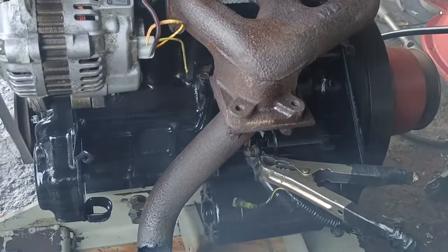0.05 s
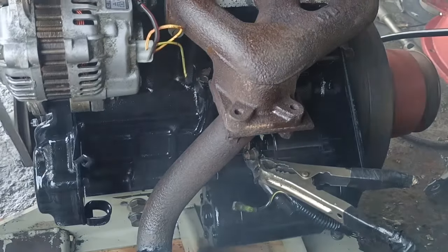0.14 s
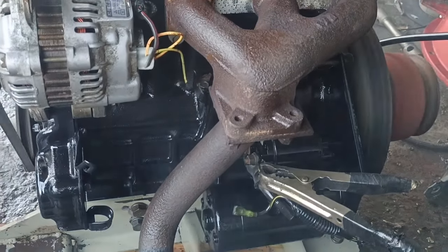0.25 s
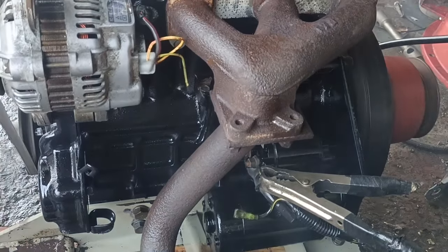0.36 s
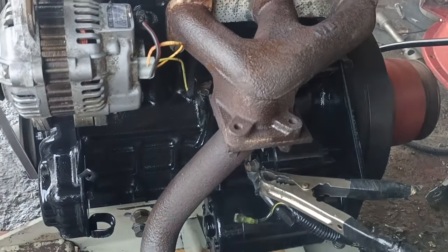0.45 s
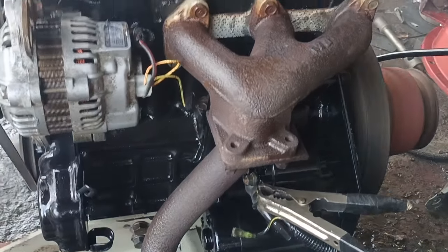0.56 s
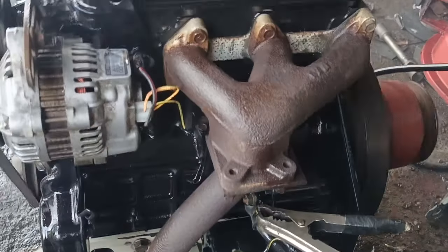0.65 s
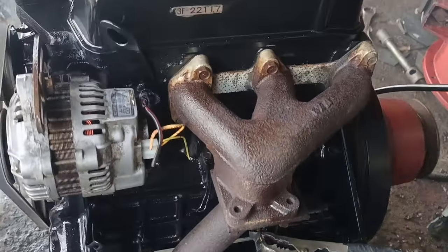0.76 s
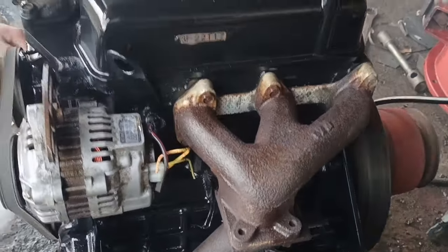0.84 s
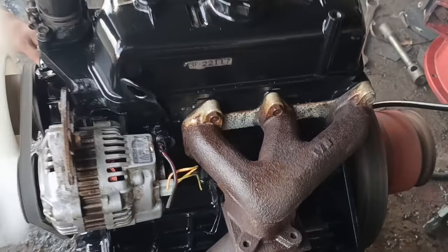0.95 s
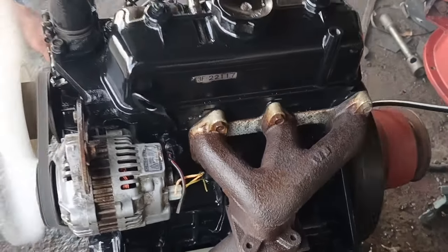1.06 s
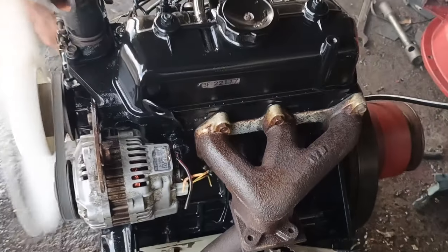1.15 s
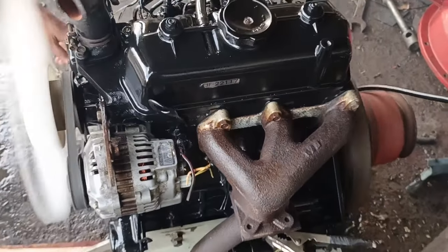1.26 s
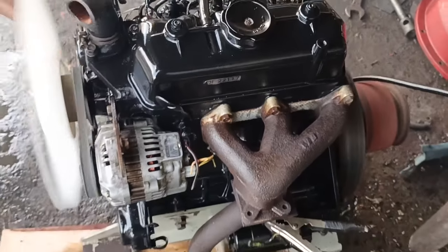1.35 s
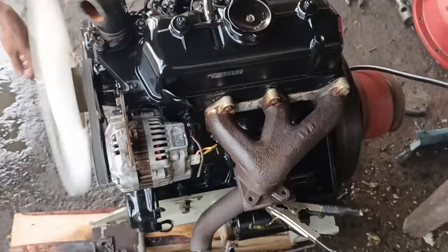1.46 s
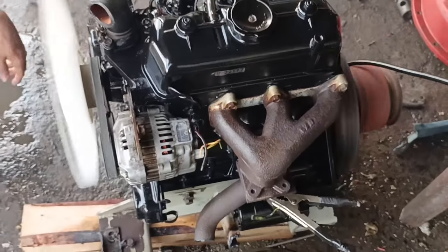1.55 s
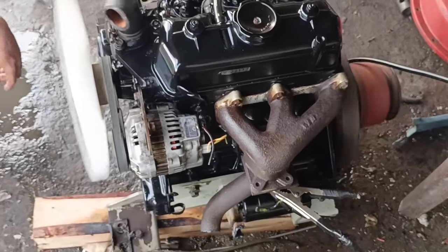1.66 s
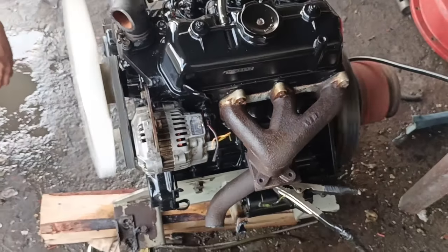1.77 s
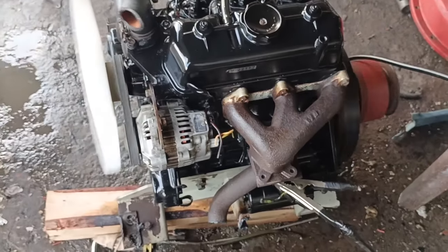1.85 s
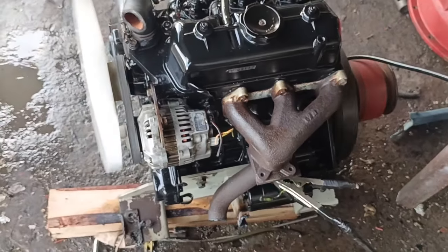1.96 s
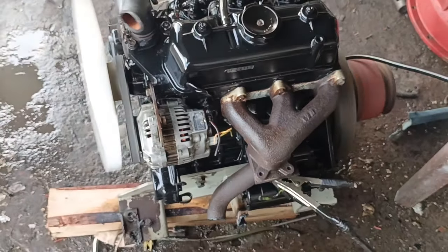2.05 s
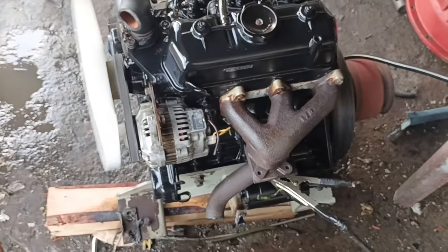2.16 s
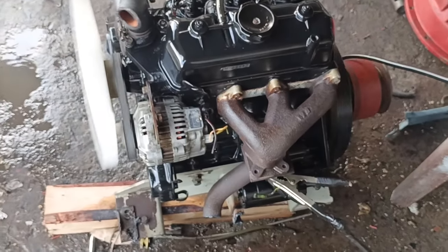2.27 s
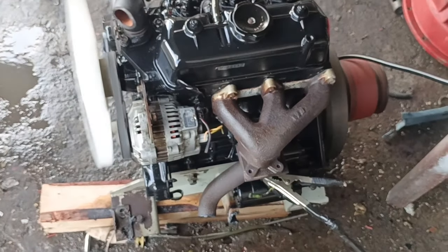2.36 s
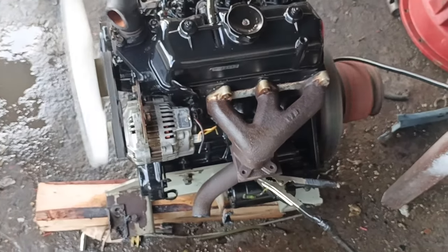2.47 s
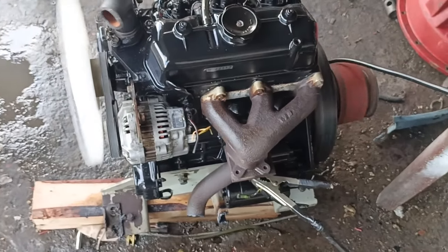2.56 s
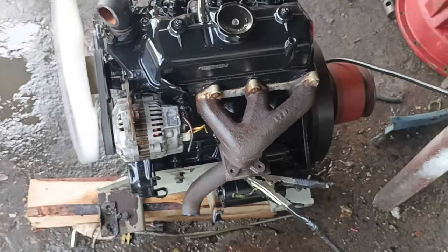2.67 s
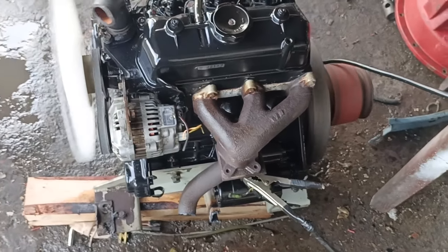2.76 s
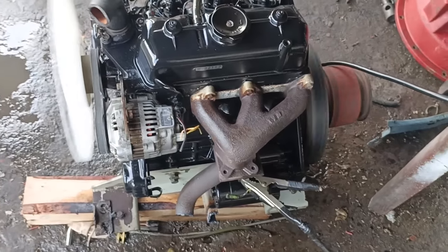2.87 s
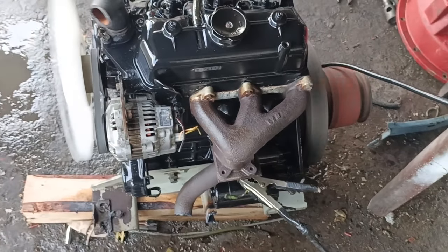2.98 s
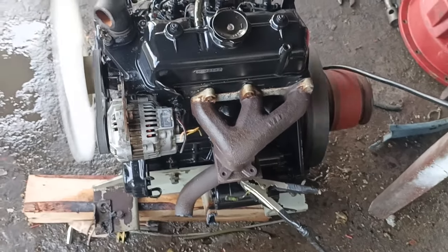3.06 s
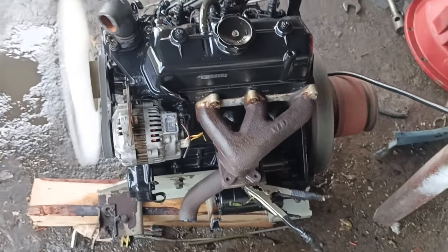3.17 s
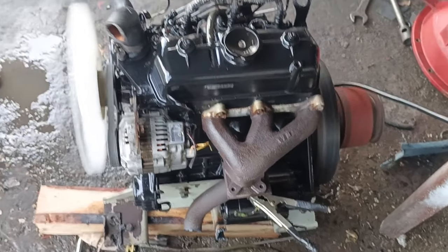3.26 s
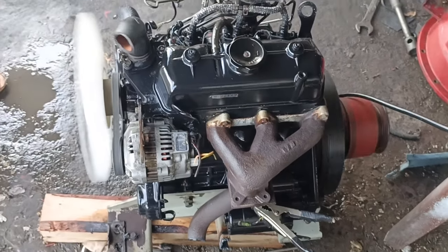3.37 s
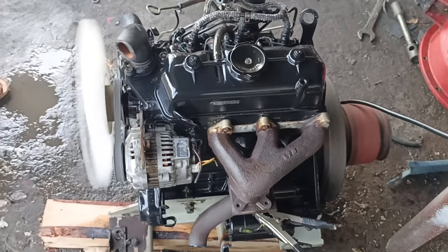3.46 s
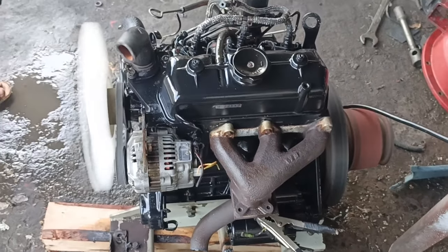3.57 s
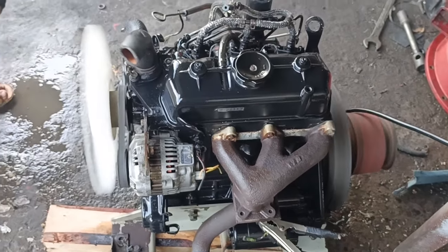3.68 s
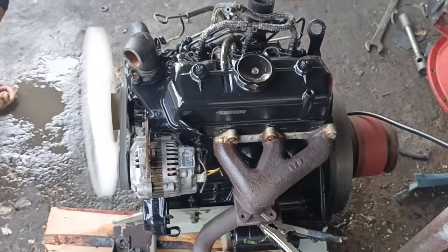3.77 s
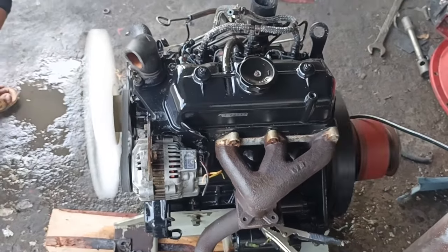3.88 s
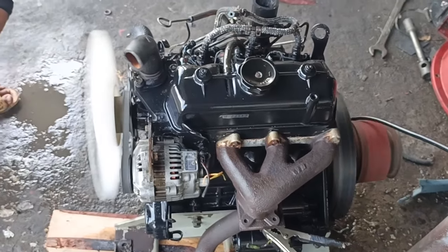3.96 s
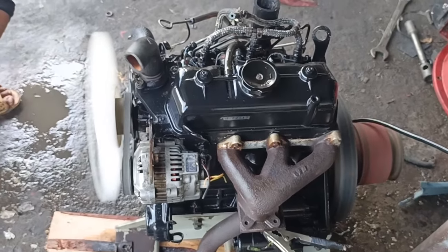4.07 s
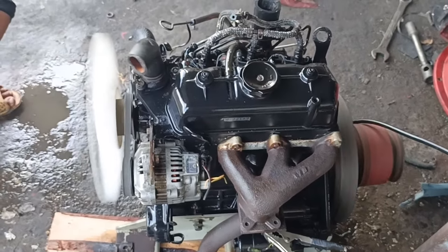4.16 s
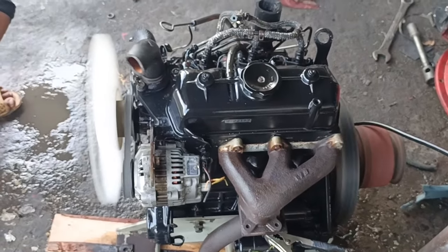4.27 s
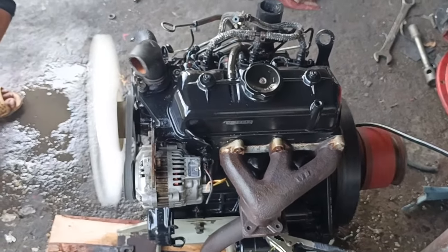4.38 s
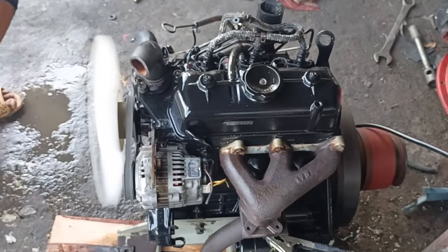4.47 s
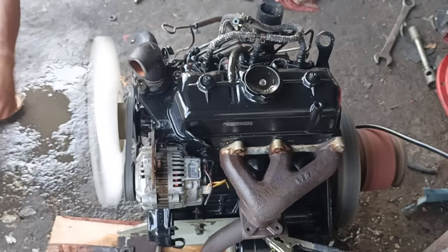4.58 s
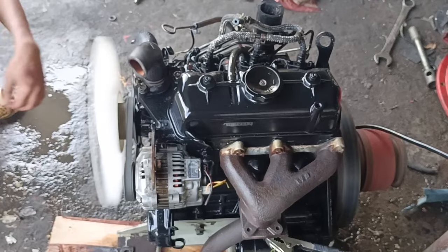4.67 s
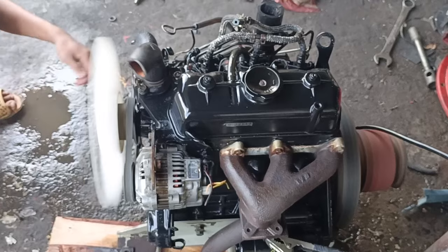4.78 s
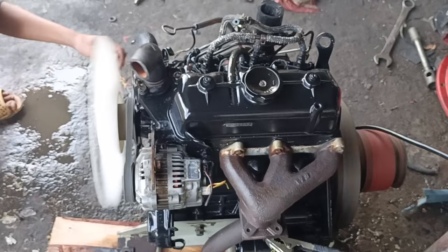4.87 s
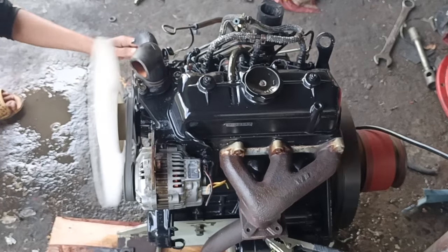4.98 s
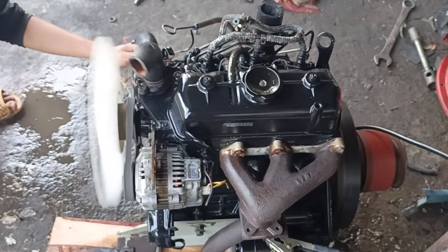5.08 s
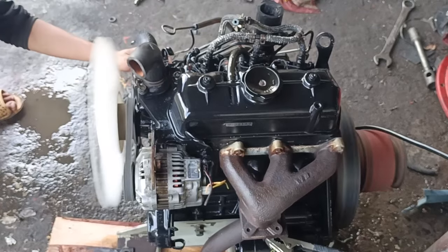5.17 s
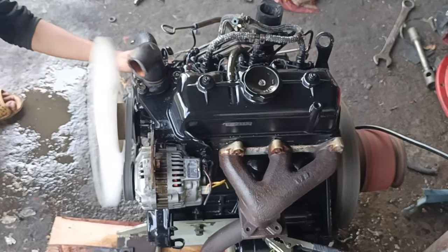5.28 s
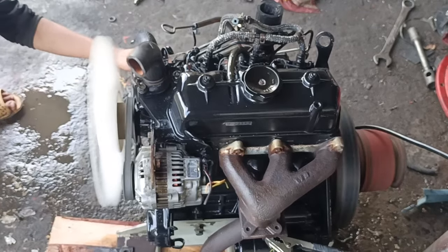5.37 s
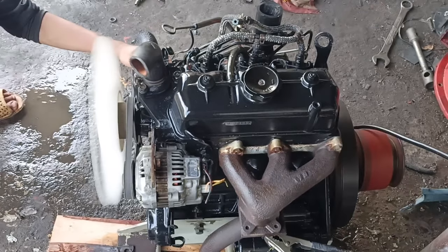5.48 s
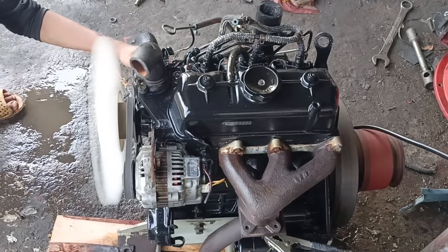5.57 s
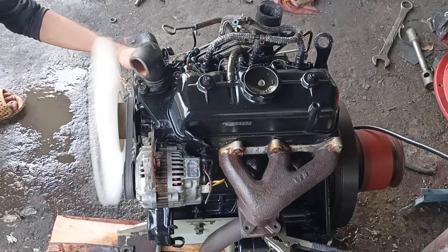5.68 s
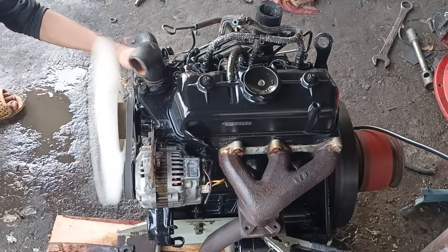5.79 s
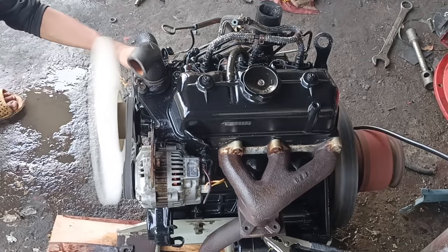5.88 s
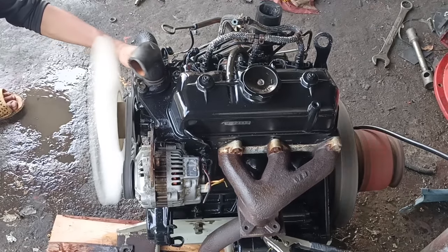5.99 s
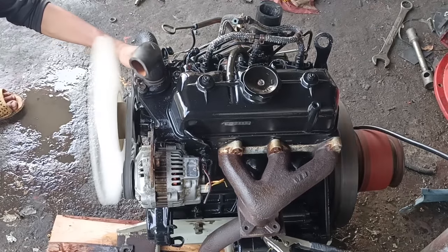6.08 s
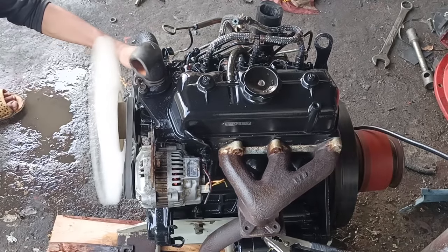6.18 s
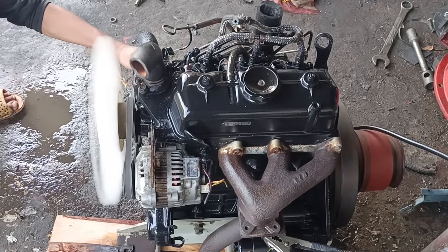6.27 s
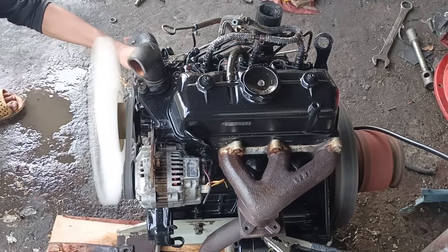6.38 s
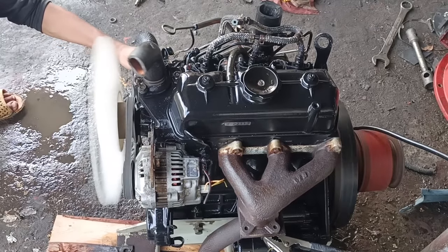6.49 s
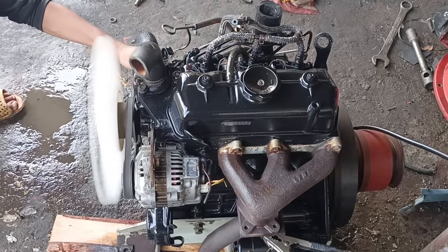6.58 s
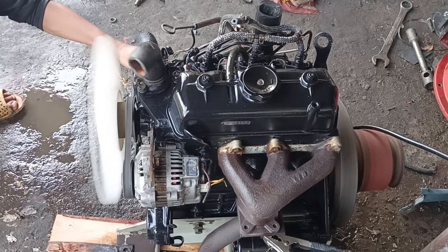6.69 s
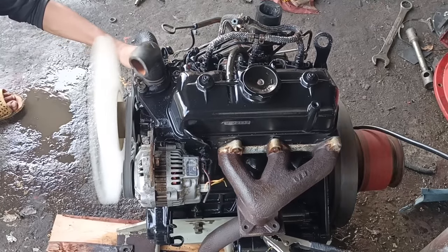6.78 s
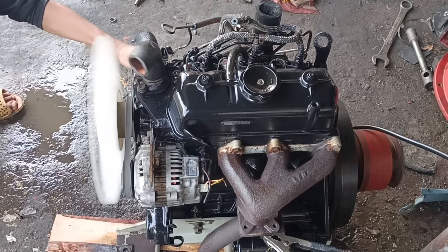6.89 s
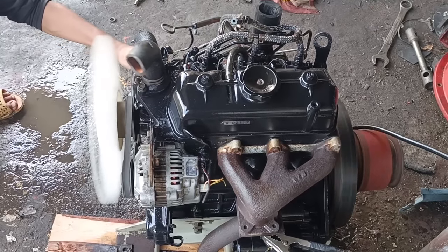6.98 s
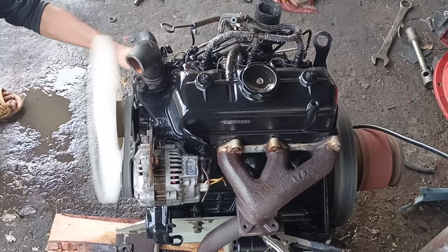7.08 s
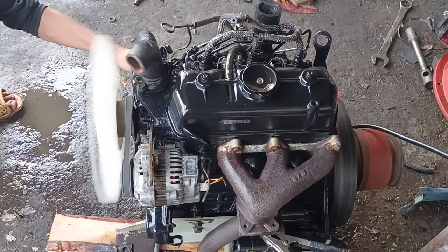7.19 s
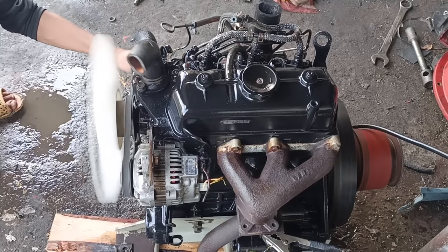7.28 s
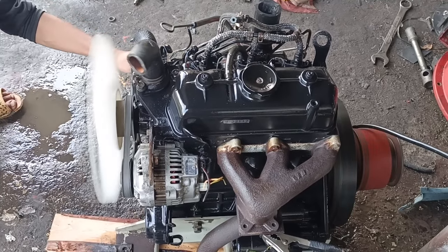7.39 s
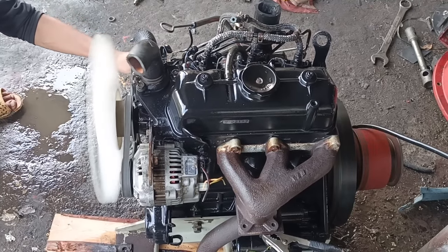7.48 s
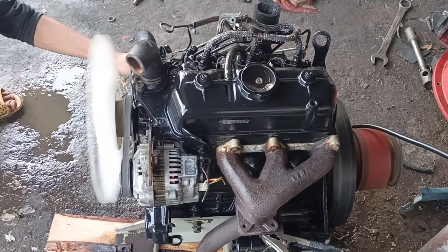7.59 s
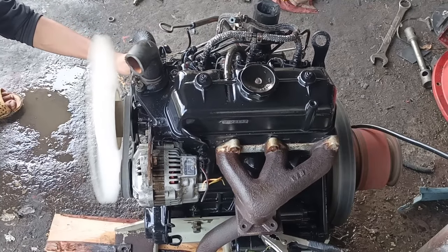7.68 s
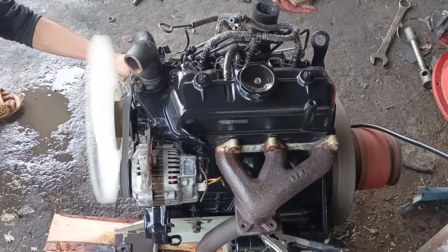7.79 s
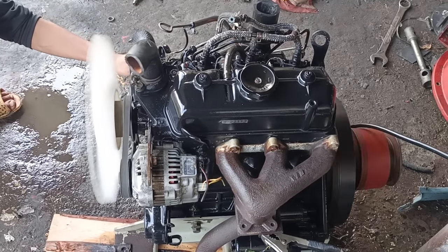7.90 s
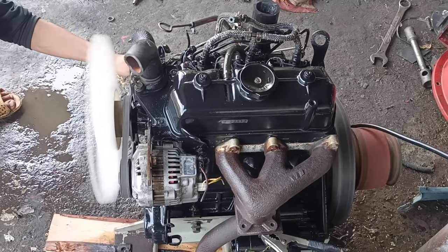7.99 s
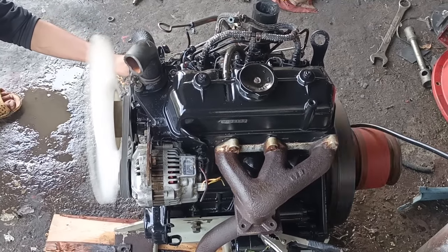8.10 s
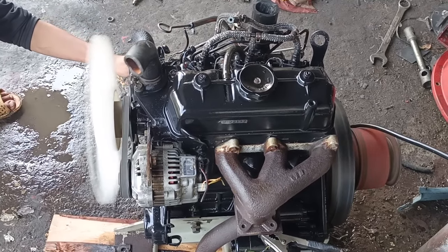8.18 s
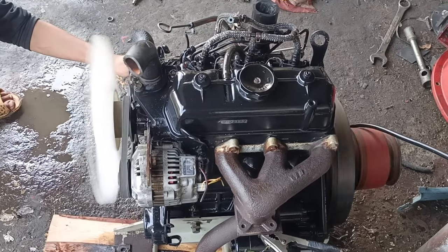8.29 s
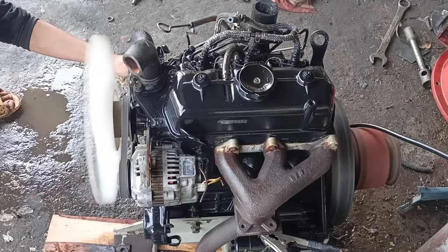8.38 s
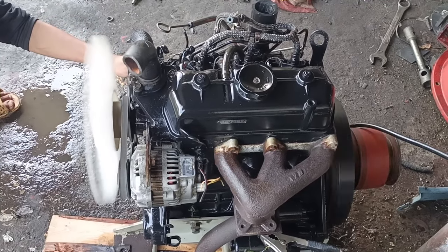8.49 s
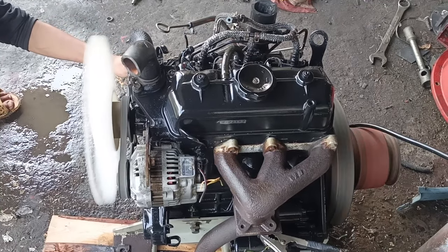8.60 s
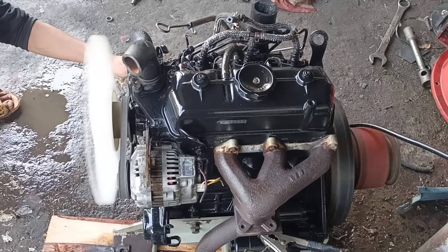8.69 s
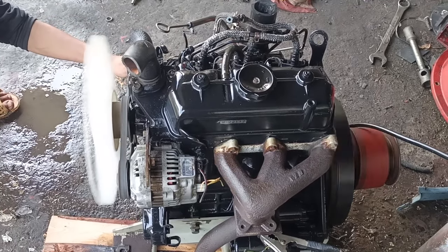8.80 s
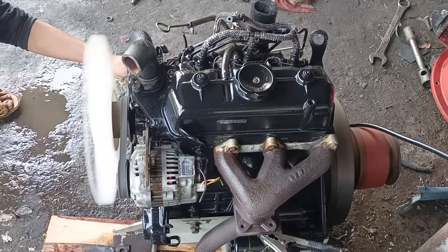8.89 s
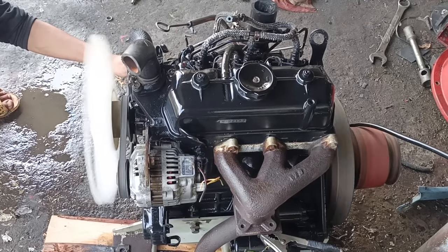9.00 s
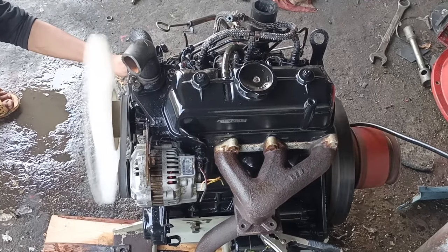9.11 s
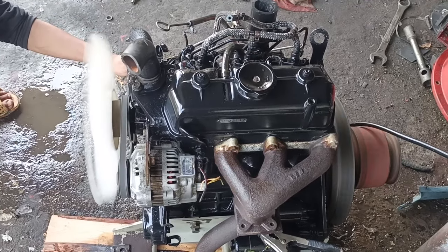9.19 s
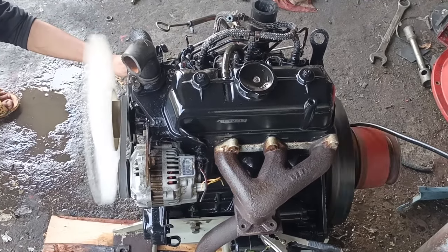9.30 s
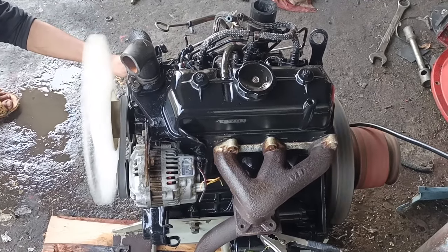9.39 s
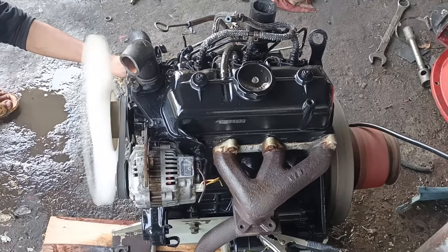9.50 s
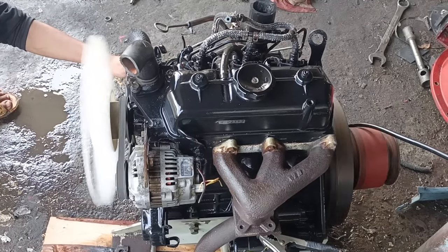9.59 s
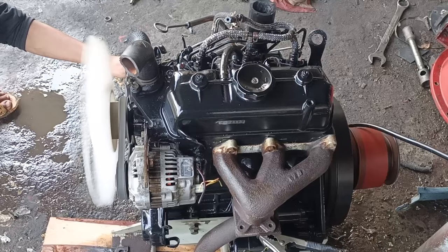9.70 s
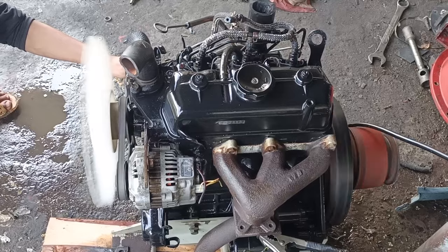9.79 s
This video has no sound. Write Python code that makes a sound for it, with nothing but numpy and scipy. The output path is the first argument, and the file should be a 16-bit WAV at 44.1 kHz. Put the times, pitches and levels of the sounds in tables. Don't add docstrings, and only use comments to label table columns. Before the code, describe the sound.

From 0 s a small three-cylinder diesel is already running fast, very close, its open exhaust blending about 49 pulses a second into a rough, low buzzing roar. Knocking metal, loose rattles and a thin ticking valve hiss ride on top. Between about 0.7 and 1.8 s the microphone backs off to a metre, so the exhaust softens and its tone shifts; a brief lean-in comes near 3 s. Underneath, slightly left, a second engine hums in wavering low tones, beating against the first; from about 4.1 s it slows, falling in pitch, and fades away after 5.4 s. The near engine holds steady until just before 7 s, when speed flicks up slightly and fuel is cut. Exhaust force collapses to quiet hollow pumping; pitch slides down, individual knocks separate, and looser clatter and valve ticks stand out. By 9.85 s it turns at roughly half speed, still coasting, with two stray ticks near the end.

```python
import sys
import numpy as np
from scipy import signal
from scipy.io import wavfile
from scipy.ndimage import uniform_filter1d

SR = 44100
rng = np.random.default_rng(int(sys.argv[2]) if len(sys.argv) > 2 else 0)


def store_wav(level_fs):
    pcm = np.round(np.clip(np.atleast_2d(level_fs), -1, 1) * 32767)
    wavfile.write(sys.argv[1], SR, pcm.T.astype(np.int16))


def natural_amplitude(level_db):
    exponent = np.asarray(level_db, float) / 20
    return 10 ** exponent


N = 434385
TIME = np.arange(N) / SR
SLOW = 64


def evened(x):
    return x / np.sqrt(np.mean(x ** 2) + 1e-20)


def read(points, hz):
    f, value = np.transpose(points)
    return np.interp(np.log(hz + 1), np.log(f + 1), value)


def curves(rows, step=1):
    s, *columns = np.transpose(rows)
    return [np.interp(TIME[::step], s, column) for column in columns]


def full(slow):
    return np.interp(TIME, TIME[::SLOW], slow)


def drift(per_s):
    size = max(int(SR / SLOW / per_s), 1)
    wander = rng.standard_normal(len(TIME[::SLOW]))
    return evened(uniform_filter1d(uniform_filter1d(wander, size), size))


# f/Hz, likeness [0-1]
PORT_LIKENESS = [(60, 1), (130, 1.0), (290, 0.86), (640, 1), (1410, 0.77), (3100, 0.6), (6820, 0.13),
                 (15000, 0.01)]
# f/Hz, left minus right level/dB
PORT_BALANCE = [(60, 0.0), (92, 4), (140, 7), (210, 0), (330, 6), (500, 2.5), (770, 0), (1170, 3.5),
                (1790, 4), (2740, 2), (4190, -2.5), (6410, -11.5), (9810, 10.5), (15000, 6.5)]


def ports(a, b, hz):
    same = np.clip(read(PORT_LIKENESS, hz), 0, 1)
    lean = natural_amplitude(read(PORT_BALANCE, hz) / 2)
    mixed = same * a + np.sqrt(1 - same ** 2) * b
    return np.array([a * lean, mixed / lean])


def noise(spectrum, patchy_db):
    hz = np.fft.rfftfreq(512, 1 / SR)
    a, b, c, d, patches = rng.standard_normal((N // 128 + 5, 257, 5)).T
    patches = evened(uniform_filter1d(uniform_filter1d(patches, 5, 0), 12, 1))
    colour_db = read(spectrum, hz)[:, None] + patchy_db * patches
    z = ports(a + 1j * b, c + 1j * d, hz[:, None]) * natural_amplitude(colour_db)
    return evened(signal.istft(z, nperseg=512, noverlap=384)[1][:, :N])


# t/s, firings [per s]
SPEED = [(0, 49.05), (1, 48.97), (1.9, 48.92), (2.4, 49.1), (4, 49.18), (5, 49.2), (5.5, 49.3), (6, 49.16),
         (6.7, 49.2), (6.93, 49.9), (7.21, 48.2), (7.52, 45.3), (8.01, 39.5), (8.29, 37.9), (8.72, 35.0),
         (9.3, 30.2), (9.85, 26.5)]
# t/s, closeness to the pipe [0-1], fuel [0-1]
STATE = [
    (0, 0.64, 0.97),
    (.7, 0.62, 0.96),
    (1.2, 0.35, 0.92),
    (1.8, 0.24, 0.98),
    (6.85, 0.08, 1),
    (7.1, 0.03, 0.02),
    (9.85, 0.4, 0.05),
]
# t/s, distance [m]
DISTANCE = [
    (0, 0.64),
    (.3, 0.59),
    (1.1, 0.76),
    (1.7, 1),
    (2.7, 1.03),
    (3.15, 0.91),
    (3.7, 1.03),
    (6.8, 1.0),
    (9.85, 1.02),
]
LOUDNESS = [
    (-20.5, 1.23, -4, -11),
    (-24.5, 0.88, -1.56, -8.5),
    (-35.5, 0.97, -.5, -10),
]


def levels(step=1):
    metres, fuel, rate = curves(DISTANCE, step)[0], curves(STATE, step)[1], curves(SPEED, step)[0]
    governed, shake_rate, shake_width = 49.2, 31.7, 4.3
    shake_db = 4.5 * np.exp(-((rate - shake_rate) / shake_width) ** 4)
    exhaust_db, clatter_db, hiss_db = (
        db - share * 20 * np.log10(metres) + (1 - fuel) * unfuelled_db + halving_db * np.log2(governed / rate)
        for db, share, unfuelled_db, halving_db in LOUDNESS)
    return exhaust_db, clatter_db, hiss_db + shake_db


# multiple of the firing rate, close level/dB, far level/dB
BLOWS = [(1, -35, -34.5), (2, -14, -22.5), (3, -11, -24.5), (4, -28, -22.5), (5, -20.5, -23.5),
         (6, -21.5, -28.5), (7, -18.5, -30), (8, -67, -36.5), (9, -40, -52), (10, -54, -57), (11, -47, -50),
         (12, -60, -60), (13, -60, -60), (14, -60, -62), (15, -60, -60)]
# f/Hz, level/dB
PIPE = [(50, -45), (77, -38), (86, -43), (100, -23.5), (120, -18), (145, -25), (175, -35.5), (205, -22),
        (240, -22), (290, -29.5), (350, -37.5), (450, -42), (600, -55)]
# f/Hz, level/dB re exhaust
UNEVEN = [(30, -68), (70, -29), (115, -19.5), (170, -31.5), (230, -29.5), (320, -24.5), (370, -27.5),
          (450, -35)]
PUMP_TILT_DB = -0.48
PUMP_OPPOSES = (3, 4)
PUMP_SWELL = 0.27
ECHO_S, ECHO = .008, .65


def exhaust(firings):
    rate, level_db = curves(SPEED, SLOW)[0], levels(SLOW)[0]
    close, fuel = np.clip(curves(STATE, SLOW), 0, 1)
    gains = []
    for k, near_db, far_db in BLOWS:
        firing = fuel * natural_amplitude(close * near_db + (1.5 - close) * far_db)
        pumping = (1 - fuel) * natural_amplitude(read(PIPE, k * rate) + PUMP_TILT_DB * k)
        gains.append(firing - pumping if k in PUMP_OPPOSES else firing + pumping)
    gains = np.array(gains)
    total_db = 10 * np.log10((gains ** 2).sum(0))
    gains *= natural_amplitude(level_db - total_db + PUMP_SWELL * (1 - fuel) * (total_db + 22))
    out = np.zeros(N)
    for k, gain in enumerate(gains, 1):
        lead = 1.7 + 3.6 * np.arctan(85 / (k * rate)) ** 1.5
        lead += np.angle(1 + ECHO * np.exp(-2j * np.pi * k * rate * ECHO_S))
        lead += 0.024 * drift(14)
        waver_db = .6 * drift(12) + 1.3 * (1 - fuel) * drift(7)
        out += full(gain * natural_amplitude(waver_db)) * np.cos(2 * np.pi * k * firings + full(lead))
    for order in [k for k in range(4, 30) if k % 3]:
        line_db = read(UNEVEN, order * rate / 3) + 3.9 * (1 - fuel) + 3.74 * drift(4.5)
        turns = order * firings / 3 + rng.random()
        out += full(natural_amplitude(level_db + line_db)) * np.cos(2 * np.pi * turns)
    return np.sqrt(2) * out


# knock level/dB, lateness [s]
CYLINDER = [
    (0, 0),
    (-5.5, .00015),
    (-4, .00006),
]


def knocks(firings, rate, at, rise_s, fall_s, spread_db, bed, scatter_s=0, unlike=1):
    count = np.floor(firings - at + 3).astype(int)
    strong, late = rng.standard_normal((count.max() + 1, 2))[count].T
    own_db, own_s = unlike * np.array(CYLINDER)[count % 3].T
    since = (firings - at) % 1 / rate - own_s - scatter_s * (3 + late)
    since = np.maximum(since, 0)
    blow = (1 - np.exp(-since / rise_s)) * np.exp(-since / fall_s)
    return bed + natural_amplitude(own_db + spread_db * strong) * blow


# f/Hz, width [Hz], close level/dB, far level/dB, coasting level/dB
BLOCK = [(605, 94, -11, -2.5, 0.5), (845.5, 25, -5, -3, -3), (919, 58, 1, -3.5, -1),
         (1052, 170, -6, -6.5, -7), (1308, 91, -29, -6.5, -3), (1697, 70, 6, -6.5, -3),
         (1945, 76, -17, 1, -0.5), (2220, 97, -7, -14, -8.5), (2377, 107, -15, -2, 3),
         (2517, 59, -3, -1, -6), (3020, 640, 1, -11.5, -2), (3257, 62, -15, -1, -3.5),
         (3895, 75, -1.5, -5, -7), (5310, 72, -10.5, -19.5, -29)]
KNOCK_AT = [.27, 1.2, .3, 2.15, 2.2, 2.97, 1.72, .92, 1.92, 1.95, .9, 1.9, 1.9, 2.7]
# f/Hz, level/dB per Hz
RATTLE = [(60, -17), (100, -12), (250, -6), (440, -9), (700, -8.5), (1100, -12), (1500, -8), (2500, -2.5),
          (3000, -9.5), (3600, -11.5), (4300, -18.5), (5000, -30), (7000, -70)]
REBOUND_S, REBOUND = .009, .5


def clatter(firings):
    rate, level_db = curves(SPEED)[0], levels()[1]
    close, fuel = np.clip(curves(STATE, SLOW), 0, 1)
    slack = full(2.6 - 1.592 * fuel)
    out, power = np.zeros((2, N)), 0
    for (hz, width, near_db, far_db, coast_db), at in zip(BLOCK, KNOCK_AT):
        fuelled_db = close * near_db + (1 - close) * far_db
        gain = natural_amplitude(fuel * fuelled_db + (1 - fuel) * coast_db)
        loose = 1 / (1 + (1400 / hz) ** 4)
        scatter_s = slack * (5e-5 + 8e-5 * loose)
        blow, rebound = (
            knocks(firings, rate, at - .05 + after_s * rate, rise_s=5e-5, fall_s=6e-5,
                   spread_db=1.1 + 1.2 * loose, bed=0, scatter_s=scatter_s, unlike=1.1)
            for after_s in (0, REBOUND_S))
        scrape = knocks(firings, rate, at - .1, rise_s=.001, fall_s=.004, spread_db=2.2, bed=.4)
        scrape = scrape * rng.standard_normal((2, N))
        flip = rng.choice([-1., 1.], 512)[(firings - at + 3.2).astype(int)]
        hit = np.array([np.ones(N), flip]) * (blow + REBOUND * rebound)
        drive = evened(hit) + .7 * np.sqrt(slack) * evened(scrape)
        r = np.exp(-np.pi * width / SR)
        rung = signal.lfilter([1, 0, -1], [1, -2 * r * np.cos(2 * np.pi * hz / SR), r * r], drive)
        out += full(gain * natural_amplitude(1.04 * drift(3.7))) * ports(*evened(rung), hz)
        power = power + gain ** 2
    rattle = natural_amplitude(-2.0) * noise(RATTLE, patchy_db=1.5)
    return natural_amplitude(level_db) * (out / full(np.sqrt(power)) + rattle)


# f/Hz, level/dB per Hz
HISS = [(2530, -52), (4300, -1.0), (4920, 0), (5170, -3.5), (5400, -8), (5610, -5.0), (6630, -7.5),
        (7190, 0.5), (9030, -9), (9850, -6.0), (12800, -7.5), (15100, -8.0), (15700, -1.5), (17000, -14.5)]
# t/s, peak level/dB
STRAYS = [
    (9.5692, -35),
    (9.7877, -32),
]
VALVE_AT, SECOND_VALVE = 2.6, .43


def valves(firings):
    rate, level_db = curves(SPEED)[0], levels()[2]
    puff = tick = 0
    for at, share in ((VALVE_AT, 1), (VALVE_AT + SECOND_VALVE, .7)):
        puff = puff + share * knocks(firings, rate, at, rise_s=.0002, fall_s=.005,
                                     spread_db=2.5, bed=.4, unlike=.4)
        tick = tick + share * knocks(firings, rate, at, rise_s=.0001, fall_s=.0009,
                                     spread_db=3.2, bed=0, unlike=.4)
    hiss = evened(puff + 0.36 * tick) * natural_amplitude(level_db)
    for s, peak_db in STRAYS:
        hiss += natural_amplitude(peak_db - 3) * (TIME > s) * np.exp(-abs(TIME - s) / 0.0043)
    r = np.exp(-np.pi * 90 / SR)
    poles = [1, -2 * r * np.cos(2 * np.pi * 7290 / SR), r * r]
    ring = signal.lfilter([1], poles, puff ** 2 * rng.standard_normal((2, N)))
    return hiss * noise(HISS, patchy_db=1.0) + natural_amplitude(level_db - 22) * ports(*evened(ring), 6300)


# f/Hz, level/dB
NEIGHBOUR_PIPE = [(50, -18), (74, -11), (120, -12), (148, -3), (180, -9), (215, -4), (250, -1), (285, -2),
                  (297, -11), (370, -19), (450, -28)]
FAR_RATE, FAR_SLOWING = 74.12, 15
FAR_CUT_S, FAR_KNEE_S, FAR_GONE_S = 4.12, .3, 5.4
FAR_DB, FAR_SAG_DB, FAR_FADE_DB = -32, -5.5, -55


def neighbour():
    t = TIME[::SLOW]
    shut_s = uniform_filter1d(np.maximum(t - FAR_CUT_S, 0), int(FAR_KNEE_S * SR / SLOW), mode="nearest")
    rate = np.maximum(FAR_RATE - FAR_SLOWING * shut_s, 10)
    level_db = FAR_DB + FAR_SAG_DB * shut_s + FAR_FADE_DB * np.maximum(t - FAR_GONE_S, 0)
    turns = np.cumsum(full(rate)) / SR + .38
    out = np.zeros(N)
    for k in range(1, 8):
        line_db = level_db + read(NEIGHBOUR_PIPE, k * rate) + 0.63 * drift(15)
        out += full(natural_amplitude(line_db)) * np.cos(2 * np.pi * k * turns + k * k)
    return out


def scene():
    firings = np.cumsum(curves(SPEED)[0]) / SR + .3
    close = curves(STATE)[0]
    left, right = exhaust(firings) + clatter(firings)
    late = 1.6 + 6.3 * close
    left = natural_amplitude(-0.44 + 1.6 * close) * np.interp(np.arange(N) - late, np.arange(N), left)
    far = neighbour() * natural_amplitude(np.array([[.8], [-.8]]))
    return np.array([left, right]) + valves(firings) + far


def top_cut(x):
    return signal.sosfilt(signal.butter(12, 17020, fs=SR, output="sos"), x)


def record(dry):
    cut = signal.sosfilt(signal.butter(2, 45, "high", fs=SR, output="sos"), dry)
    dip = .7 - 0.52 * curves(STATE)[0]
    cut = (1 - dip) * cut + dip * signal.lfilter(*signal.iirnotch(4800, 5, SR), cut)
    band_limit = signal.firwin(1023, 15860, window=("kaiser", 8), fs=SR)
    mix = signal.oaconvolve(cut, band_limit[None], "same")
    return top_cut(mix)


dry = scene()
out = record(dry)
store_wav(out)
```